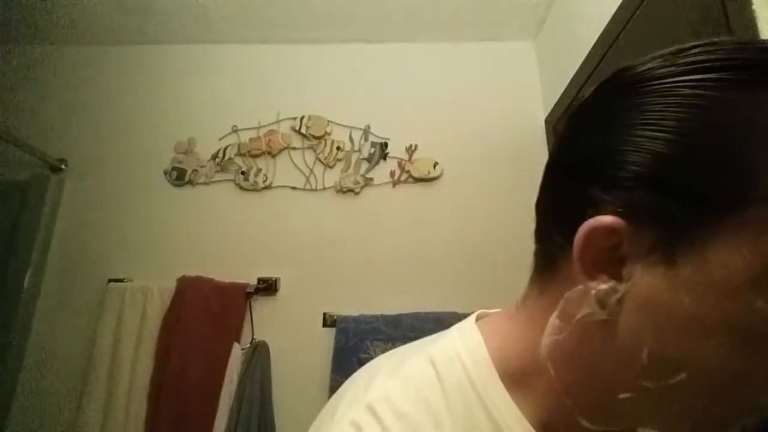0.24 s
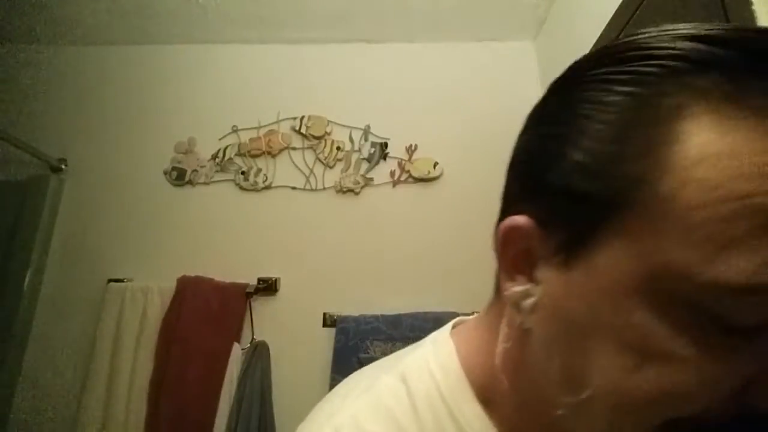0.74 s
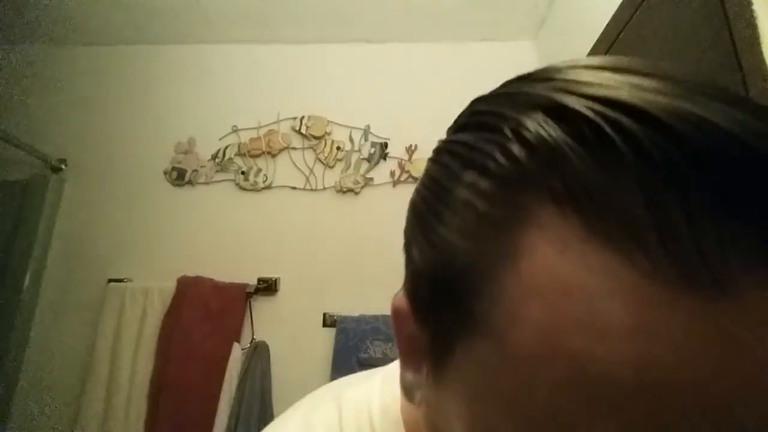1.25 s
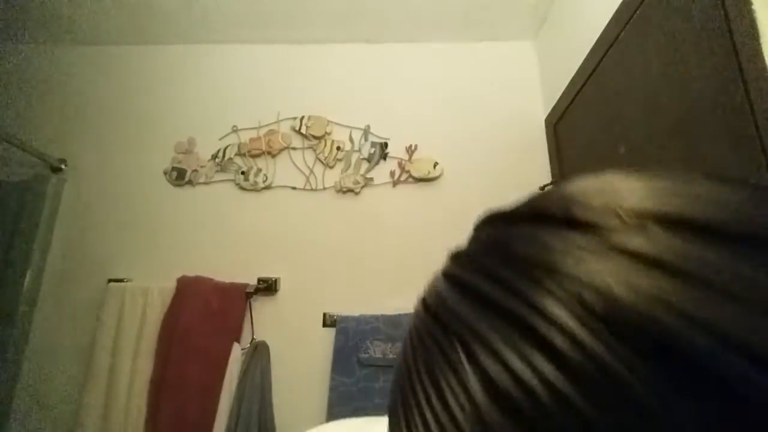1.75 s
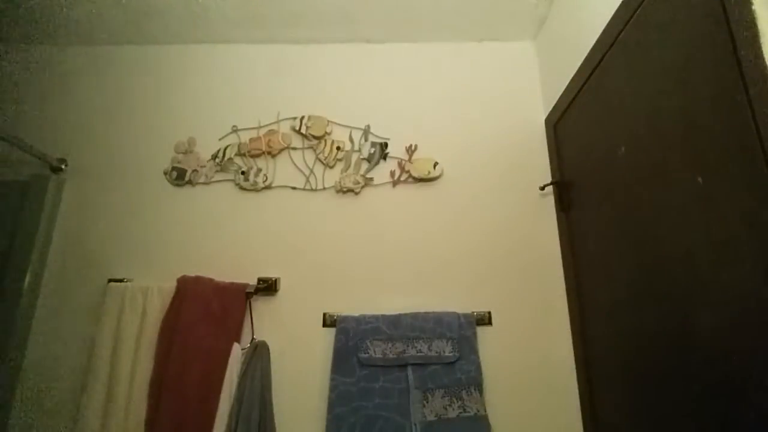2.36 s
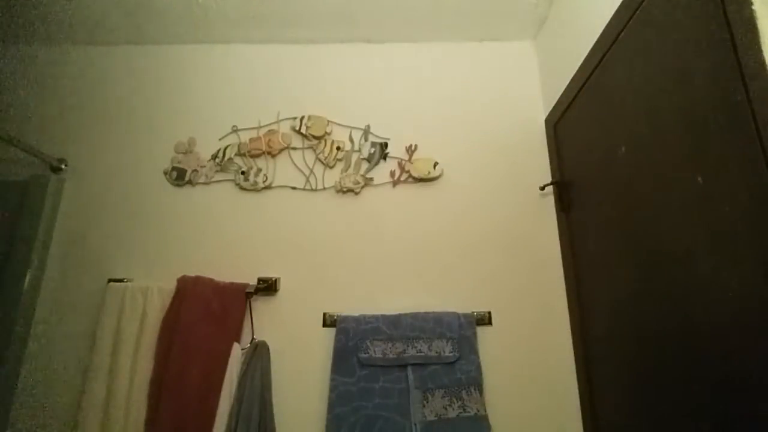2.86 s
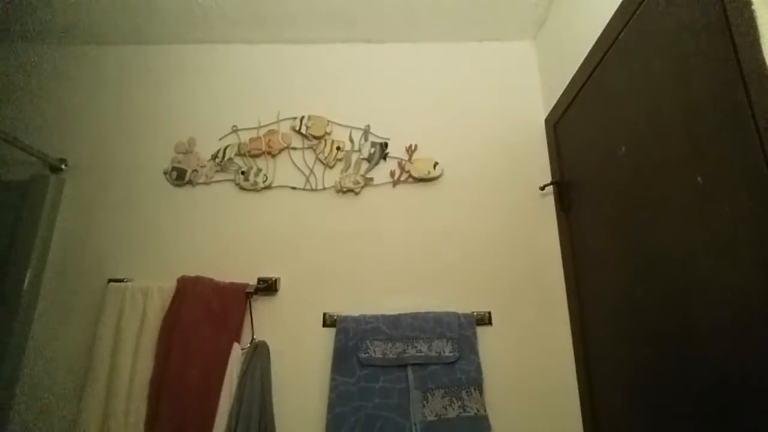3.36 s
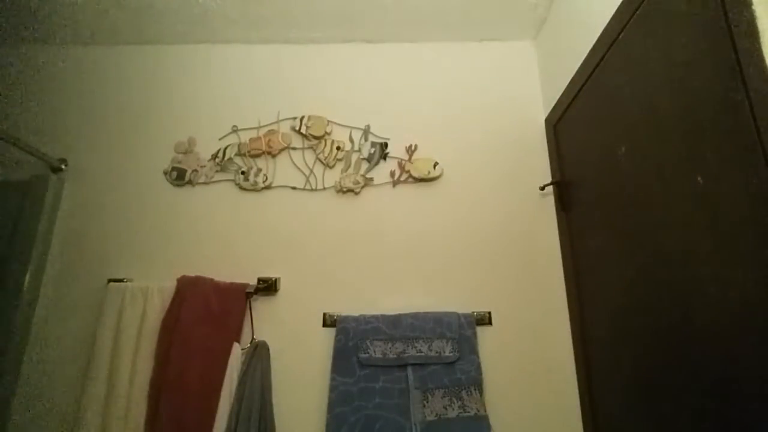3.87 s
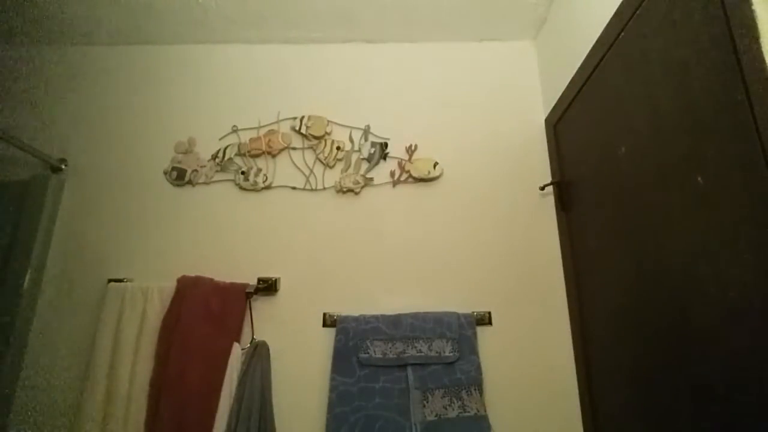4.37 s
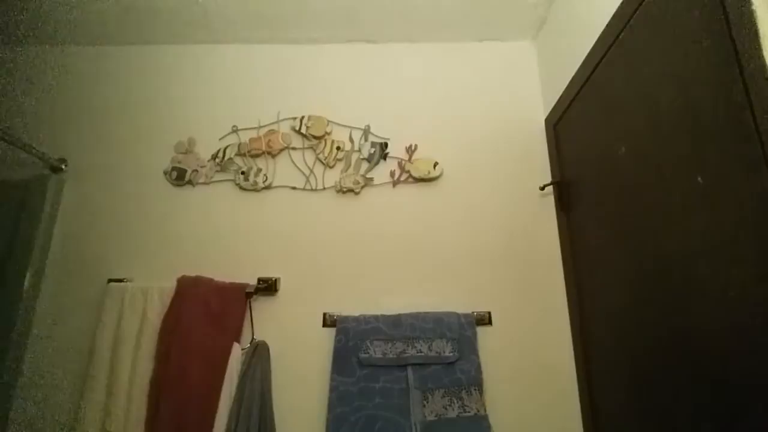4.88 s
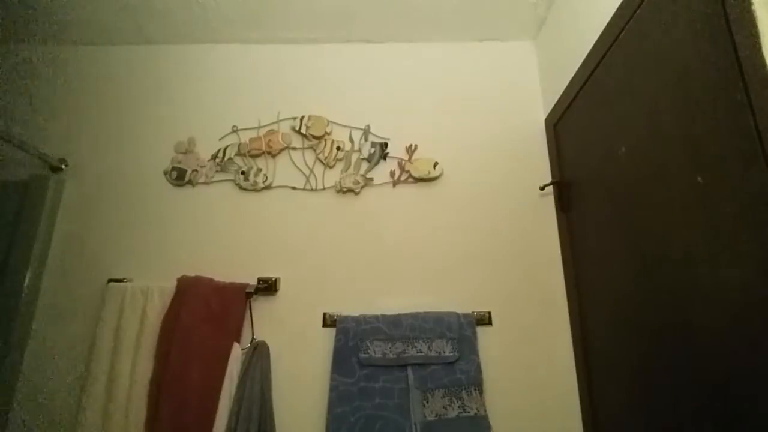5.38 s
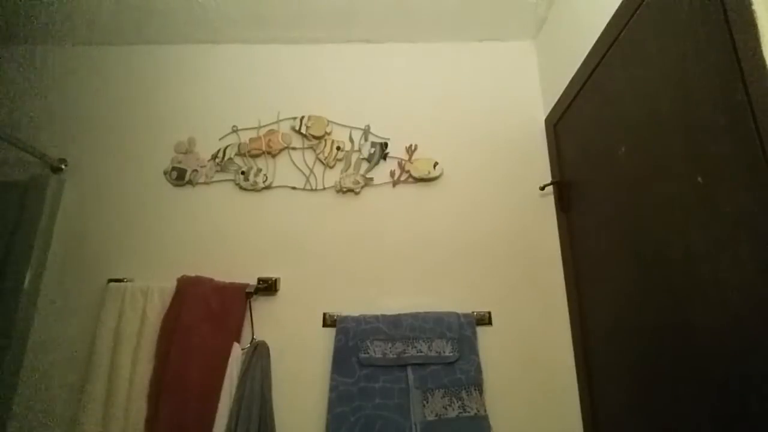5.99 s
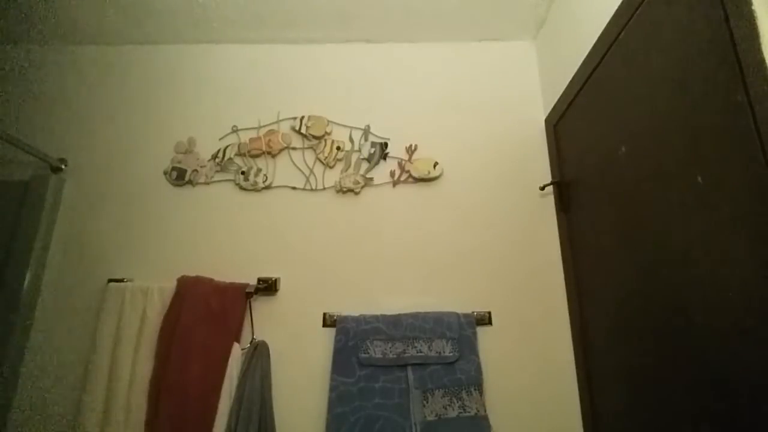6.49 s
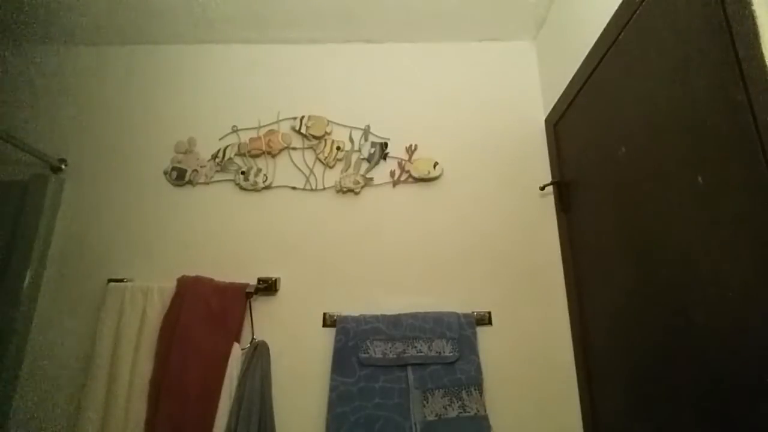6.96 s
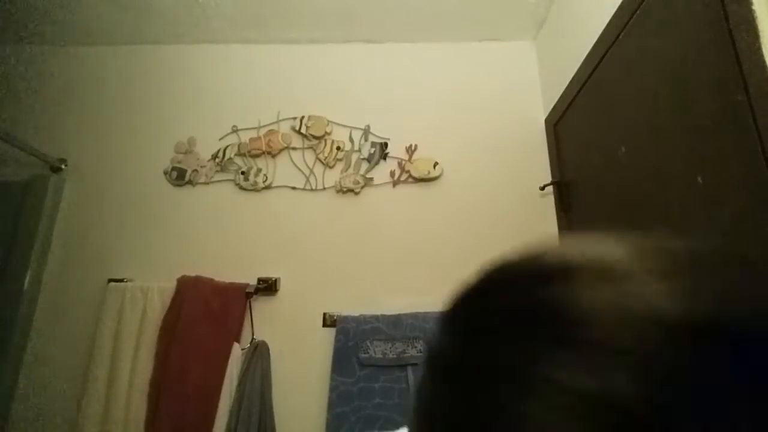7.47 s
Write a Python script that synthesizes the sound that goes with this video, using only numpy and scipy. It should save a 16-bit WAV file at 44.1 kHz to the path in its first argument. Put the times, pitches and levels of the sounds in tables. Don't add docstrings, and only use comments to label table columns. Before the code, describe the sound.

A ventilation fan rumbles low and steady throughout a small, echoing tiled bathroom, with only faint hiss above it. At the start, water swishes lightly at the basin, low bubbles plop until about 0.2 s, and a thin trickle sings in the drain until 1 s. A knock at 0.6 s is followed by firmer, hollow thumps around 0.8-0.9 s. At 1.1 s a razor hits the rim sharply and rattles through several quick bounces. From 1.5 to 2.6 s it swishes vigorously, with dense bubbling, bright spatter and a dull double knock near 1.85 s. Then mostly fan remains, with stray droplets around 3.1 and 3.7 s. A shorter splash at 4.5-5.1 s includes one prominent deep plop at 4.6 s. Sparse drips follow, with a slight stir at 6.6 s, before crisp splashing and high bubbly plops from 7.5 s to the end. The sound is close and wet, slightly left.

```python
import sys
import numpy as np
from scipy import signal
from scipy.fft import rfft, irfft, next_fast_len
from scipy.io import wavfile
from scipy.ndimage import map_coordinates

SR = 44100
rng = np.random.default_rng(int(sys.argv[2]) if len(sys.argv) > 2 else 0)


def digitize_waveform(pressure):
    field = np.atleast_2d(pressure).T
    bounded = np.clip(field, -1, 1)
    quanta = np.round(bounded * 32767).astype(np.int16)
    wavfile.write(sys.argv[1], SR, quanta)


def how_loud(loudness_db):
    steps = np.asarray(loudness_db, float) / 20
    return 10 ** steps


N = 340893

# f/Hz, level/dB per Hz
SPRAY_COLOUR = [(1500, -41), (2600, -12), (3500, -3.5), (5000, -3), (7000, -4.5), (9000, -3), (12300, -4),
                (15000, -1)]
# f/Hz, level/dB per Hz
SLOSH_COLOUR = [(400, -25.5), (700, 5.5), (1000, -3), (1400, -8), (1900, 1.5), (2400, 2), (3200, -10),
                (5000, -26), (9000, -40)]


def unit(x):
    return x / np.sqrt(np.mean(x ** 2) + 1e-20)


def noise_pair(n=N):
    return rng.standard_normal((2, n))


def along(points, hz):
    f, v = np.transpose(points)
    return np.interp(np.log(hz + 1), np.log(f + 1), v)


def filtered(x, response):
    m = next_fast_len(N + SR)
    return irfft(rfft(x, m) * response(np.fft.rfftfreq(m, 1 / SR)), m)[..., :N]


def coloured(x, spectrum):
    return unit(filtered(x, lambda hz: how_loud(along(spectrum, hz))))


def band(x, hz, sharp):
    return unit(signal.lfilter(*signal.iirpeak(min(hz, 15000), sharp, SR), x))


def wave(hz, centre_hz, width_hz):
    return 1j * hz * width_hz / (centre_hz ** 2 - hz ** 2 + 1j * hz * width_hz)


def ringing(t, t60):
    return how_loud(-60 * t / t60)


def add(track, s, sound):
    part = track[..., round(s * SR):round(s * SR) + sound.shape[-1]]
    part += sound[..., :part.shape[-1]]


def standing(hz):
    # f/Hz, width/Hz, left/dB, right/dB
    in_step = [(97.3, 13, -21.5, -17.5), (123.8, 13.1, -10, -13.5), (142.5, 3.2, -34.5, -12.5),
               (219.2, 15, -15, -27), (250.4, 5.8, -26.5, -19.5), (272.6, 28, -26, -27.5),
               (292.1, 17.2, -20, -20), (331.7, 10.6, -17.5, -16.5), (391.7, 19.1, -21, -21.5),
               (438, 30, -27.5, -31.5), (482.4, 12.1, -21.5, -24.5), (510, 41, -30, -33.5),
               (556, 22, -35.5, -62), (787, 58, -26, -42.5)]
    # f/Hz, width/Hz, left/dB, right/dB
    opposed = [(57.8, 21, -46, -31), (109.6, 10.5, -13, -5.5), (184.7, 11, -11.5, -15.5),
               (200, 16, -12, -15)]
    rows = [(row, [1, 1]) for row in in_step] + [(row, [1, -1]) for row in opposed]
    return np.array([np.outer(how_loud([left, right]) * sign, wave(hz, centre, width))
                     for (centre, width, left, right), sign in rows])


def fan():
    # f/Hz, level/dB per Hz
    air_colour = [(400, -37), (520, -6.5), (700, -19.5), (820, -16.5), (1050, -24), (1550, -34.5),
                  (1900, -31.5), (2300, -31), (2800, -41.5), (4200, -42), (6000, -47.5), (9000, -50),
                  (12300, -45.5), (15000, -33)]
    hz = np.fft.rfftfreq(N, 1 / SR)[:N * 1500 // SR]
    waves = standing(hz)
    drive = rng.standard_normal((len(waves), 1, len(hz), 2)) @ [1, 1j] * np.sqrt(N / 2)
    turbulence = wave(hz, 140, 950) / (1 + (hz / 520) ** 4)
    rumble = irfft((waves * drive).sum(axis=0) * turbulence, N)
    return how_loud(1.0) * rumble + how_loud(-57.5) * coloured(noise_pair(), air_colour)


def stroke_level(column):
    # t/s, held/s, slosh level/dB, spray level/dB
    strokes = [(0.0, 0.21, -63, -67), (.54, 0.068, -63, -63), (1.102, 0.07, -62.5, -61),
               (1.58, 0.16, -57, -56), (1.71, 0.106, -80, -52), (1.9, 0.23, -62, -56),
               (2.14, 0.17, -61, -52), (2.29, 0.23, -62, -54), (3.8, 0.36, -75, -77),
               (4.4, 0.056, -72.5, -64), (4.54, 0.14, -62.5, -54), (4.86, 0.04, -60.5, -55.5),
               (5.04, 0.062, -75, -62.5), (6.6, 0.176, -78, -66), (7.55, 0.074, -71, -59),
               (7.68, .06, -69, -55)]
    dip_s, lift_db_per_s = 0.033, 122
    settle_db, settle_db_per_s = -10.5, 11.5
    t, power = np.arange(0, N + 64, 64) / SR, 1e-11
    for row in strokes:
        start, held = row[:2]
        rise = np.clip((t - start) / dip_s + 1, 0, 1) ** 2
        after = np.maximum(t - start - held, 0)
        fall = how_loud(-lift_db_per_s * after) + how_loud(settle_db - settle_db_per_s * after)
        power = power + (how_loud(row[column]) * rise * fall) ** 2
    return np.interp(np.arange(N) / SR, t, 10 * np.log10(power))


def grains(db, per_s, pitch_hz, spread, cycles, scatter_db):
    at, _, luck = rng.random((3, int(per_s * N / SR)))
    hz = pitch_hz * np.exp(spread * rng.standard_normal(len(at)))[:, None]
    t = np.arange(400) / SR
    size = how_loud(-scatter_db * np.log(luck + 0.0091))[:, None]
    chirp = np.sin(2 * np.pi * hz * t * (1 + 12 * t)) * np.exp(-t * hz / cycles)
    index = (at * N).astype(int)[:, None] + np.arange(len(t))
    swarm = np.bincount(index.ravel(), (size * chirp).ravel(), N + len(t))[:N]
    return how_loud(db) * unit(swarm)


def swish():
    slosh_db, spray_db = stroke_level(column=2), stroke_level(column=3)
    slosh = grains(slosh_db + 1, per_s=1100, pitch_hz=2000, spread=.45, cycles=6, scatter_db=3.2)
    slosh = slosh + how_loud(slosh_db - 5.5) * coloured(noise_pair(), SLOSH_COLOUR)
    flicker = map_coordinates(rng.standard_normal(N // 90 + 2), [np.arange(N) / 90], order=1)
    crackle = noise_pair() * how_loud(3.4 * flicker)
    return slosh + how_loud(spray_db - 5.0) * coloured(crackle, SPRAY_COLOUR)


def drain():
    # t/s, level/dB
    trickle = [(0, -59), (0.249, -62.5), (.5, -57.5), (.78, -55.5), (.95, -68), (1.05, -110)]
    # f/Hz, width/Hz, level/dB
    pipe = [(850, 180, -4), (1300, 180, 3), (2060, 100, 0.5), (2590, 63, -4), (3400, 60, -6)]
    level_db = np.interp(np.arange(N) / SR, *np.transpose(trickle))
    response = lambda hz: sum(how_loud(db) * wave(hz, centre, width) for centre, width, db in pipe)
    return how_loud(level_db) * unit(filtered(noise_pair(), response))


def bubbles():
    # t/s, peak level/dB, f/Hz, left-right/dB
    plops = [(0.087, -45, 1080, 0), (.097, -43, 780, 0), (0.103, -43, 1056, 0), (.121, -42, 800, 2),
             (.148, -42, 646, 0), (.178, -48, 1620, 0), (.624, -44, 900, 2), (.125, -39, 650, 6),
             (0.175, -32.5, 773, 2), (.803, -40, 1250, 2), (1.532, -47, 780, 4), (1.549, -34.5, 817, 3),
             (1.599, -40, 810, -2), (1.684, -46, 1280, 2), (1.787, -45, 1380, 2), (1.811, -39, 1250, 1),
             (1.842, -38, 890, 4), (2.128, -47, 1300, -2), (2.022, -46.5, 1280, 0),
             (1.561, -36.5, 1024, -2), (1.608, -32, 748, 5), (1.629, -38, 760, 1), (1.705, -42, 1300, 1),
             (1.739, -39.5, 840, 0), (1.9, -47, 1390, -3), (2.07, -45, 1568, 0.5), (2.216, -43.5, 840, -2),
             (2.294, -42, 710, -3), (2.308, -37.5, 740, -1), (2.318, -54, 850, -3), (2.34, -52, 900, 0),
             (2.52, -47, 1270, 0), (2.569, -43, 866, -1), (2.572, -47, 1300, 0), (2.59, -52, 955, -2),
             (2.6, -54, 1190, 0), (2.615, -59, 960, -2), (4.528, -36.5, 880, -2), (4.612, -24, 682, 7),
             (4.613, -48, 1310, -1), (4.622, -37, 750, -9), (4.68, -49, 1390, 3), (4.776, -47, 1330, -2),
             (4.805, -46, 1640, -1.5), (4.812, -52, 1270, -2), (7.66, -51, 1750, 3)]
    # t/s, peak level/dB, f/Hz, left-right/dB
    drips = [(0.0938, -43, 1830, 0), (.11, -45, 1920, 0), (.64, -49, 2650, -2), (0.603, -49.5, 2060, 9),
             (1.5971, -38.5, 1943, 13), (1.533, -42, 1790, 0), (1.632, -42, 1650, 2), (1.643, -46, 2150, 2),
             (1.685, -42, 1910, 2), (1.7, -43, 2300, -4), (1.724, -45, 1850, 2), (1.826, -42, 2130, 2),
             (1.912, -43, 1720, 4), (1.968, -49, 2070, 0), (2.047, -48, 2400, -4),
             (1.7918, -36, 1940, -1.5), (1.8088, -44, 2220, 8.5), (1.917, -44, 2030, 11.5),
             (2.0672, -51, 2250, 9), (2.1276, -45, 2100, -10), (2.143, -36, 1790, 5),
             (2.1495, -36.5, 1850, 13.5), (2.155, -38, 2220, 0), (2.167, -45, 1750, -4),
             (2.187, -48, 2150, 3), (2.2, -51, 2100, 0), (2.247, -50, 1900, 0), (2.282, -48, 1870, 2),
             (2.414, -50, 1660, -2), (2.377, -44, 2020, 2), (2.39, -51, 2300, 2), (2.2742, -30, 2170, -1),
             (2.29, -39, 2080, 5), (2.3615, -40, 2200, 1), (2.38, -45, 2400, 3), (2.452, -46, 2060, 3),
             (2.4773, -40, 2050, 6),
             (3.64, -52, 1750, -1), (4.849, -39, 2160, 2), (4.8476, -38, 1610, 4.5),
                  (4.855, -40, 1920, 2), (4.868, -45, 2000, -4), (4.873, -54, 1550, 0),
                  (4.89, -53, 1700, 0), (4.568, -49, 1960, -3), (4.583, -46, 2270, 0),
                  (4.928, -46.5, 2420, 0), (4.9314, -53, 1950, 11), (5.5214, -48.5, 1750, 0),
                  (6.611, -44, 1910, 6.5), (6.7094, -57.5, 2100, 7), (7.5116, -57, 1680, -5),
                  (7.5183, -54, 2030, -5), (7.543, -42, 2040, 4), (7.552, -44, 2100, 2),
                  (7.586, -54, 2000, -4), (7.644, -50, 1900, -2), (7.716, -32, 2450, 4),
                  (7.724, -33, 2460, 3), (7.6608, -36.5, 2310, 1.5), (7.668, -42, 2150, 2),
                  (7.7078, -27, 2520, 2)]
    # t/s, peak level/dB, f/Hz, left-right/dB
    ticks = [(0.0513, -50, 3530, 6.5), (0.2567, -57, 3820, 16), (0.2673, -45.5, 3160, 0),
             (1.7937, -48, 2810, -3), (1.9189, -41.5, 2870, -4), (1.985, -51, 3000, -5),
             (2.122, -46, 2900, 0), (2.2484, -47, 4400, 2), (2.283, -43, 2590, 5), (2.355, -40, 3060, -2),
             (2.365, -45, 2750, -2), (2.4721, -49, 3700, 0), (2.4836, -40, 2800, -3), (4.565, -37, 3630, 6),
             (1.5484, -35, 2680, -5), (1.6935, -39.5, 6510, 5), (1.877, -36, 2810, 0),
             (1.989, -49.5, 3460, -4), (2.102, -36.5, 2780, -1), (2.148, -39.5, 2890, -3.5),
             (2.3318, -42.5, 3370, 6), (2.5, -46, 2960, -5), (3.7334, -55.5, 3380, 2),
             (4.1011, -63, 4130, -4), (4.555, -40, 3650, 7), (4.705, -48, 3900, 1.5),
             (4.784, -50, 3580, 11), (4.796, -46.5, 3130, -3), (5.068, -50, 4340, 8),
             (5.283, -55, 5580, -7), (5.703, -65, 4000, 0), (7.708, -41, 3450, 0), (7.544, -45, 3610, 2),
             (0.281, -54, 4770, -2)]
    rise, snap_s = 0.081, 0.00055
    out, t = np.zeros((2, N)), np.arange(SR // 8) / SR

    def pop(hz, life):
        climb = 1 - rise / 4 + rise * t / life
        return np.sin(2 * np.pi * hz * t * climb) * ringing(t, life) * (1 - np.exp(-t / snap_s))

    for s, db, hz, pan_db in plops + drips + ticks:
        life = 0.027 * (2000 / hz) ** 0.47
        side = how_loud(db + 4.5 + np.array([[pan_db], [-pan_db]]) / 2)
        late, detune = rng.random(2)
        puff = band(noise_pair(len(t)), hz, sharp=18.0) * how_loud(-9) * ringing(t, 1.57 * life)
        add(out, s, side * (pop(hz, life) + puff * np.tanh(t / 0.00079)))
        reflection = how_loud(-9.0) * side * pop(hz * (0.927 + 0.275 * detune), life)
        add(out, s + .007 + 0.0056 * late, reflection)
    return out


def spatter():
    # t/s, peak level/dB, t60/s, crackle
    # f/Hz
    drops = [(0.052, -47, 0.25, 4240), (0.141, -42.5, 0.115, 12500), (0.269, -44.5, 0.234, 4700),
             (0.3285, -47, 0.066, 9950), (1.0996, -30, .2, 3700), (.852, -42, .12, 5200),
             (1.464, -51.5, 0.23, 4180), (1.548, -38, 0.15, 3900), (1.693, -33, 0.13, 5700),
             (1.808, -45, 0.08, 3800), (7.5128, -45.5, 0.45, 4200), (3.059, -60, 0.044, 3000),
             (1.716, -31, 0.036, 11800), (1.8038, -33, 0.14, 8700), (1.8325, -33, 0.2, 10500),
             (1.919, -35, 0.032, 8720), (2.101, -35.5, 0.29, 8400), (2.333, -35.5, 0.13, 5100),
             (2.4022, -33.5, 0.052, 12000), (2.483, -37, 0.24, 9100), (2.484, -41.5, 0.15, 3600),
             (1.788, -46, 0.093, 2200), (2.21, -46, .15, 4000), (4.91, -49, .1, 4300),
             (0.6, -44, 0.15, 6000), (2.351, -39.5, 0.095, 3400), (2.7436, -51, 0.29, 9200),
             (3.073, -44, 0.21, 8220), (4.528, -35.5, 0.31, 12300), (4.553, -30, 0.2, 6370),
             (4.6194, -39, 0.067, 12800), (4.7052, -44, 0.18, 4400), (4.847, -41, 0.082, 13300),
             (5.067, -49, 0.15, 4270), (6.7116, -54.5, 0.085, 4020), (7.5114, -32.5, 0.25, 12700),
             (7.54, -32, 0.16, 9700), (7.7087, -37, 0.097, 5480)]
    # t/s, peak level/dB
    flecks = [(2.1994, -61.5), (3.227, -54), (3.7296, -57.5), (4.384, -53), (5.0303, -49), (5.1317, -45),
              (5.9294, -57), (6.2536, -56), (6.466, -49), (6.545, -52), (6.5926, -53)]
    fleck_t60_s, fleck_hz = 0.2, 12300
    fine, broad, body = np.zeros((2, N)), np.zeros(N), np.zeros(N)
    t = np.arange(SR // 3) / SR
    for s, db, t60, hz in drops + [(s, db, fleck_t60_s, fleck_hz) for s, db in flecks]:
        froth_db = 0.5 - 6.5 * np.log2(hz / 5000)
        burst = how_loud(db - 12.5) * ringing(t, t60) * (1 - np.exp(-t / 0.00081))
        add(fine, s, burst * band(noise_pair(len(t)), hz, sharp=3.6))
        add(broad, s, 0.93 * burst)
        add(body, s, burst * how_loud(froth_db - 3.0))
    froth = grains(0, per_s=1300, pitch_hz=3100, spread=.4, cycles=4, scatter_db=3.2)
    froth = 0.98 * froth + 1.36 * coloured(noise_pair(), SLOSH_COLOUR)
    return fine + broad * coloured(noise_pair(), SPRAY_COLOUR) + body * froth


def knocks():
    # t/s, crack level/dB, thump level/dB, thump f/Hz, bright level/dB
    blows = [(0.619, -43.5, -32, 254, -14), (0.802, -46, -19.5, 136, -29), (.833, -26, -23.5, 266, -20),
             (0.8517, -25.5, -18, 232, -7.5), (1.0987, -20, -25.5, 320, -12.5),
             (1.107, -23, -24.5, 260, -18), (1.118, -32, -28, 298, -8), (1.144, -25.5, -26, 200, -10.5),
             (1.172, -28.5, -37, 298, -22), (1.195, -31, -30, 290, -28), (1.216, -36, -36.5, 289, -24),
             (1.232, -37.5, -32, 274, -23), (1.27, -46, -44, 250, -26), (.866, -41, -24, 328, -1),
             (.908, -48, -37, 250, -11), (1.843, -48, -24.5, 365, -14), (1.853, -48, -33.5, 327, -16.5)]
    # (a blow sounds 12 % of it, 0.2 s at most)
    basin = [(1249, 4, 0.47), (1370, -16.5, 0.14), (1750, 4, 0.19), (1900, 9, 0.124), (2170, -14, 4.0),
             (2330, -32, 4.5), (2428, 5, 0.38)]
    # f/Hz, level/dB, t60/s
    blade = [(4830, -1, .007), (3900, -7, .005), (5600, -6, .005), (13360, -30, .2)]
    # t/s, peak level/dB, blade ring level/dB
    rattle = [
        (1.099, -30, 11),
        (1.144, -25.5, 1),
        (1.173, -27, 7.5),
        (1.192, -34, -6),
    ]
    ring, push, head = np.zeros((2, N)), np.zeros(N), np.zeros(N)
    t = np.arange(SR // 2) / SR
    for s, db, thump_db, thump_hz, bright_db in blows:
        t60 = 0.13 * how_loud(0.26 * (db + 31.0))
        modes = sum(how_loud(level + rng.normal(0, 2.1)) * ringing(t, min(0.12 * life, .2))
                    * np.sin(2 * np.pi * hz * t) for hz, level, life in basin)
        noise, fade = noise_pair(len(t)), ringing(t, t60)
        chatter = how_loud(4 * np.repeat(rng.standard_normal(len(t) // 90), 90))
        crack = .85 * chatter * fade + 3 * ringing(t, .005)
        dull = band(band(band(noise, 1234, sharp=1.0), 1650, sharp=1.6), 2630, sharp=1.4)
        bright = band(noise[::-1], 11666, sharp=0.53) + 0.64 * band(noise, 5250, sharp=5.6)
        shudder = 0.74 * modes + crack * dull + how_loud(bright_db + 7) * crack * fade * bright
        add(ring, s, how_loud(db - 13.0) * shudder)
        thump = np.sin(2 * np.pi * thump_hz * t) * ringing(t, 0.048)
        rub = band(band(noise[0], 0.84 * thump_hz, sharp=0.83), thump_hz, sharp=0.49)
        onset = np.tanh(t / 0.00038) ** 2
        add(push, s, how_loud(thump_db) * onset * (thump + 0.33 * fade ** 0.51 * rub))
    for s, db, blade_db in rattle:
        for hz, level, t60 in blade:
            mode_db = db + level + blade_db * (hz > 9e3)
            tone = np.sin(2 * np.pi * hz * t) * np.tanh(t / 0.00048)
            add(head, s, how_loud(mode_db) * ringing(t, t60) * tone)

    def room(hz):
        low = standing(hz[:12000]).sum(axis=0)
        return np.pad(low, ((0, 0), (0, len(hz) - 12000)))

    boom = filtered(push, room) * how_loud([[-1.5], [1.5]])
    at_basin = ring + how_loud(1.0) * push + how_loud(3.5) * head
    at_microphones = how_loud(-5.5) * head + how_loud(10.5) * boom + how_loud(-11.5) * push
    return at_basin, at_microphones


def walls(x):
    # f/Hz, t60/s
    tiles = [(200, 0.17), (1000, 0.52), (4000, 0.69), (12000, 0.7)]
    hop, out = SR // 5, np.zeros((2, N))
    padded = np.pad(x, ((0, 0), (hop, 2 * hop)))
    for k in range(0, N + hop, hop):
        hz, t, z = signal.stft(noise_pair(SR // 2), SR, nperseg=256)
        decay = ringing(t, along(tiles, hz)[:, None]) + 3.8 * ringing(t, 0.15)
        tail = signal.istft(z * decay, SR, nperseg=256)[1]
        piece = padded[:, k:k + 2 * hop] * signal.windows.hann(2 * hop)
        wet = signal.fftconvolve(piece, tail / np.linalg.norm(tail[0]), axes=1)
        add(out, max(k - hop, 0) / SR, wet[:, max(hop - k, 0):])
    return out


def scene():
    # f/Hz, level/dB
    wall_colour = [(300, 1.5), (800, -7.5), (2000, -3.5), (5000, -4), (12000, -2.5)]
    # f/Hz, left-right/dB
    side_lean = [(60, 5), (110, -9), (200, 3), (380, -3), (700, 2.5), (1280, 7), (2370, 4.5), (4370, -3.5),
                 (8060, 8), (14900, -9)]
    ring, thump = knocks()
    near = bubbles() + swish() + spatter() + drain() + ring
    near[1] = np.roll(near[1], 11)
    echo = np.pad(walls(near), ((0, 0), (130, 0)))[:, :N]
    echo = filtered(echo, lambda hz: how_loud(along(wall_colour, hz)))
    lean = lambda hz: how_loud(np.outer([.5, -.5], along(side_lean, hz)))
    return filtered(how_loud(-2.5) * near + echo, lean) + thump + fan()


def band_limit(x):
    return signal.sosfilt(signal.butter(12, 15480, fs=SR, output="sos"), x)


def record(dry):
    # f/Hz, level/dB
    mic_response = [(30, -0.5), (60, 0), (4500, 0), (5300, -0.5), (5800, -3), (6250, -3.5), (6700, 1.5),
                    (7400, -1), (8200, 0.5), (9400, -1), (10200, -1.5), (11200, 2.5), (12500, 6),
                    (14500, -5.5), (14750, -29), (15100, -44.5)]
    mix = filtered(dry, lambda hz: how_loud(along(mic_response, hz)))
    return band_limit(mix)


dry = scene()
out = record(dry)
digitize_waveform(out)
```